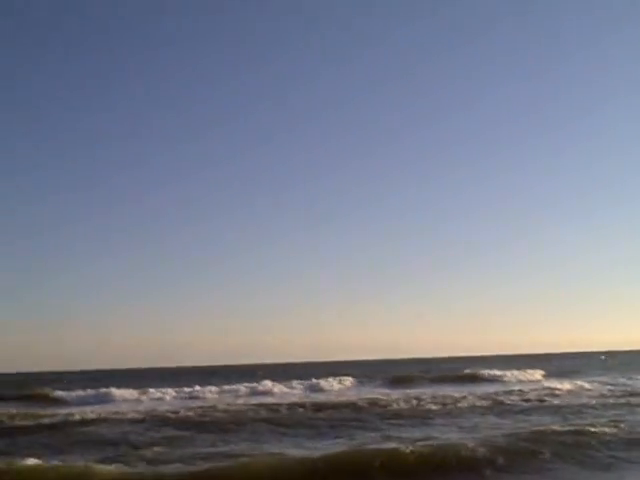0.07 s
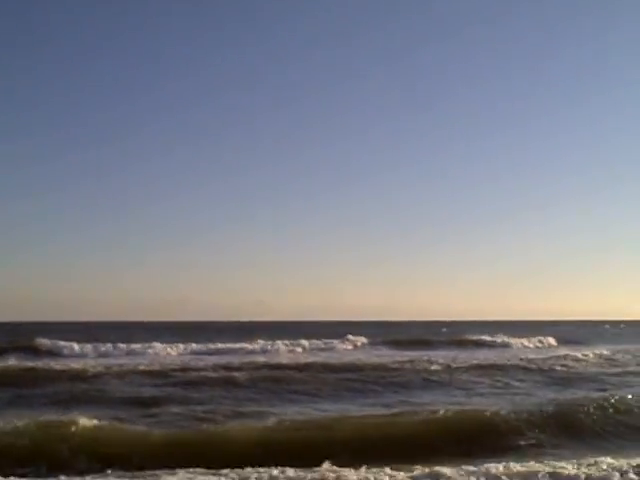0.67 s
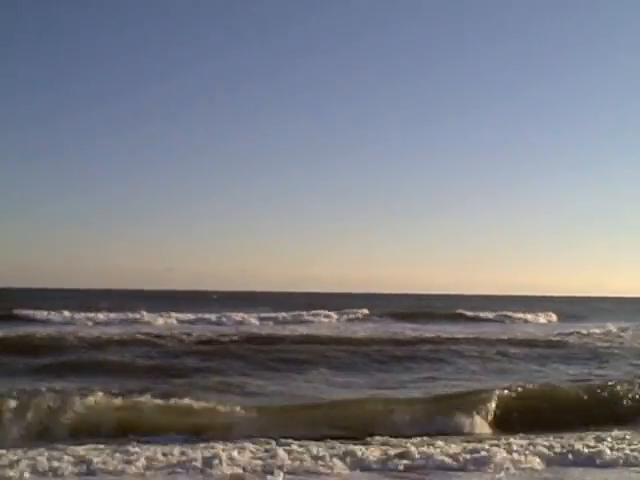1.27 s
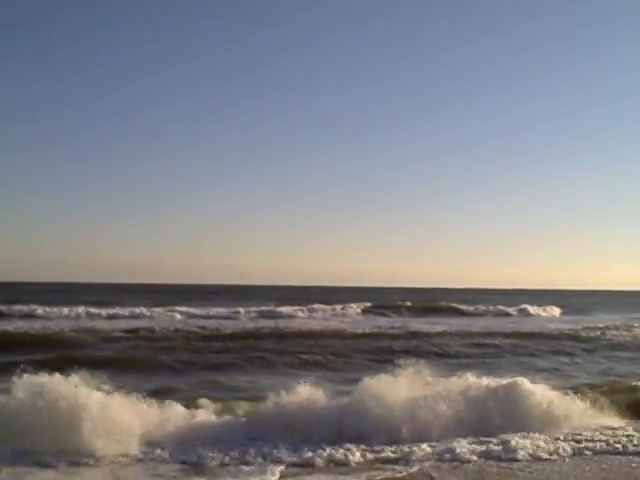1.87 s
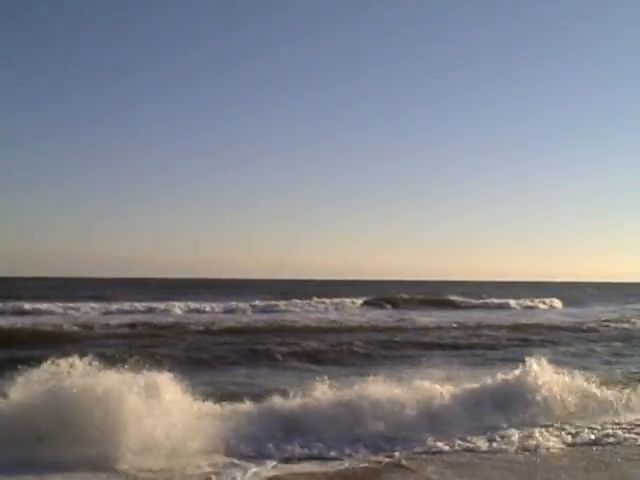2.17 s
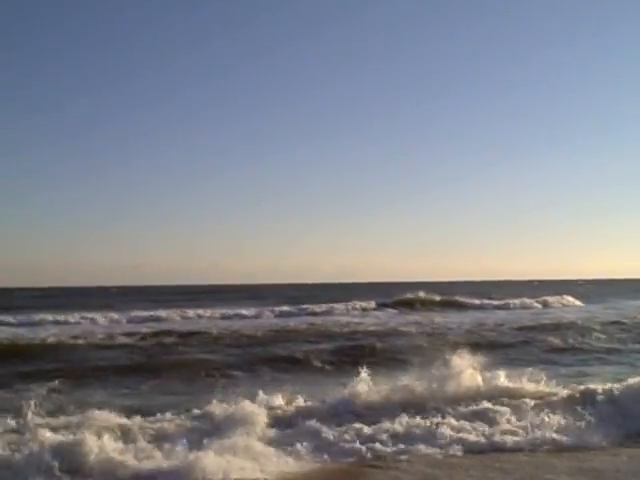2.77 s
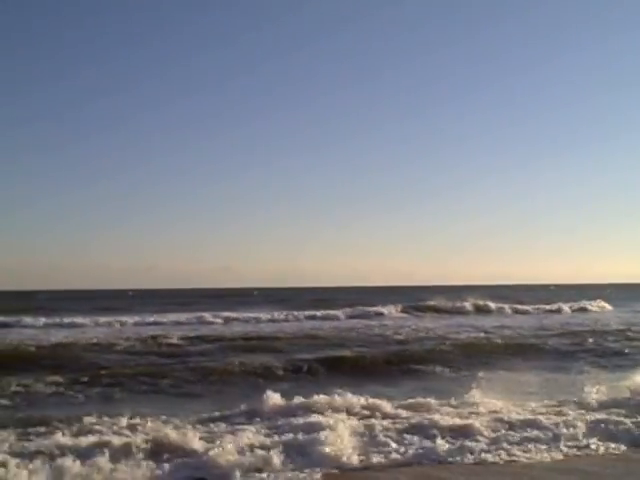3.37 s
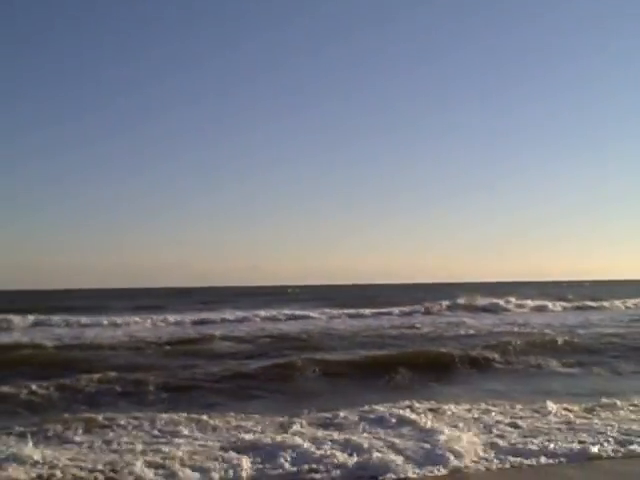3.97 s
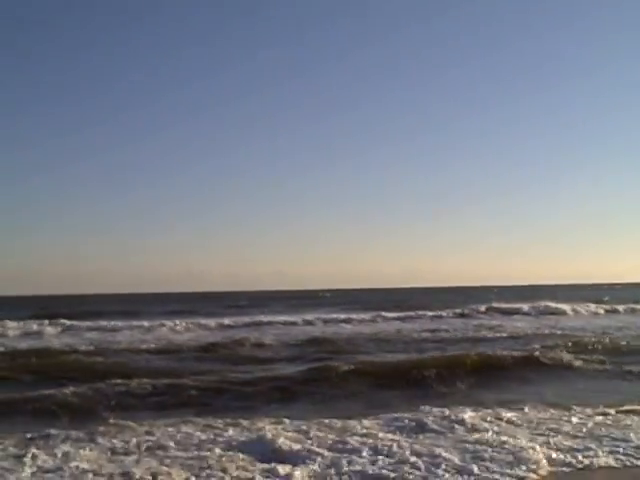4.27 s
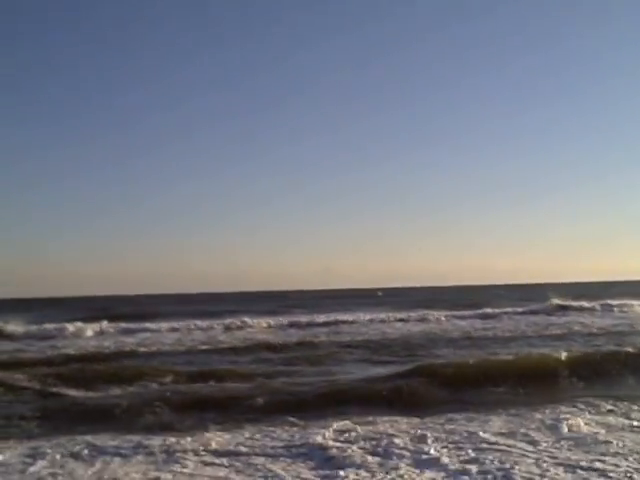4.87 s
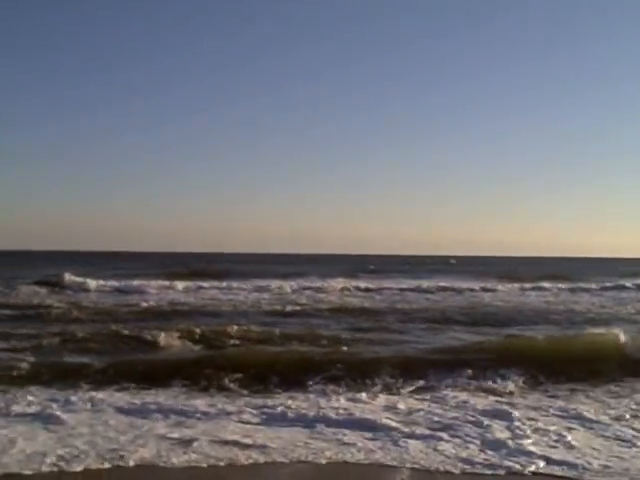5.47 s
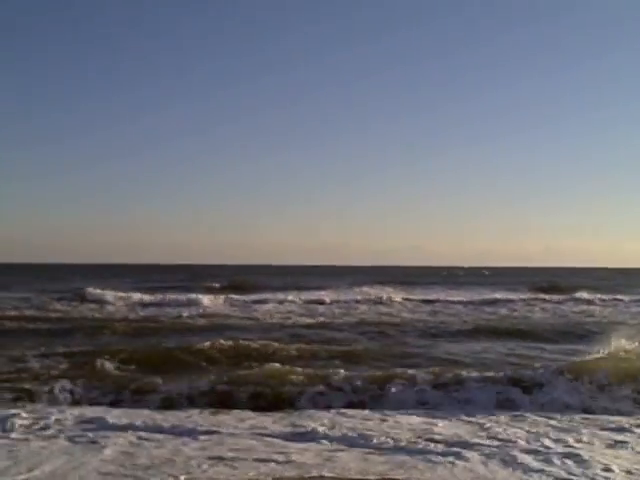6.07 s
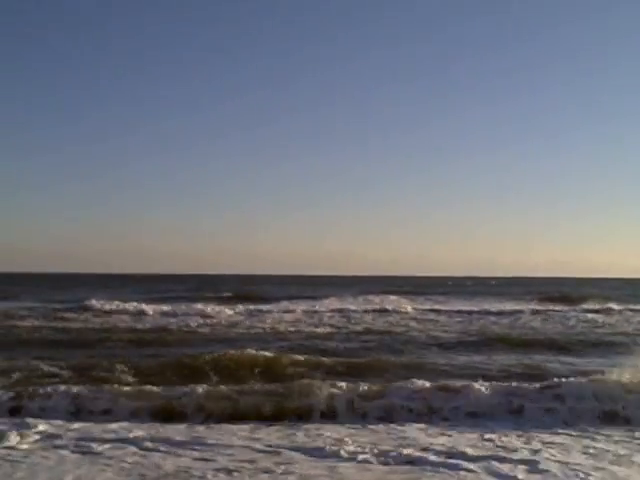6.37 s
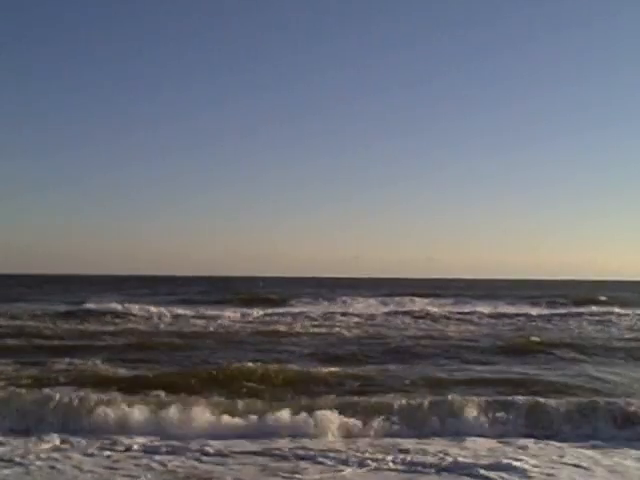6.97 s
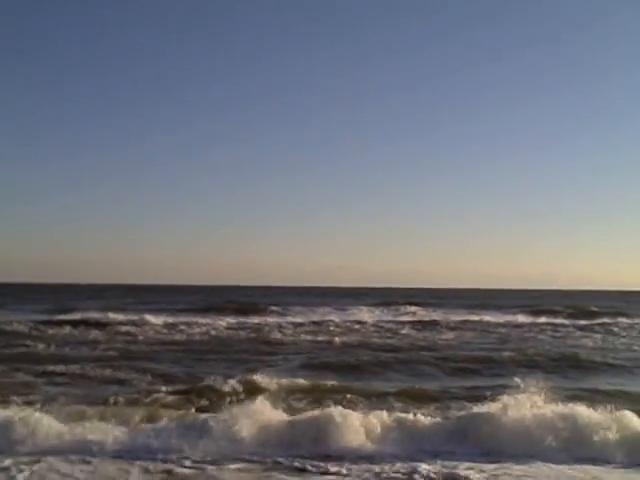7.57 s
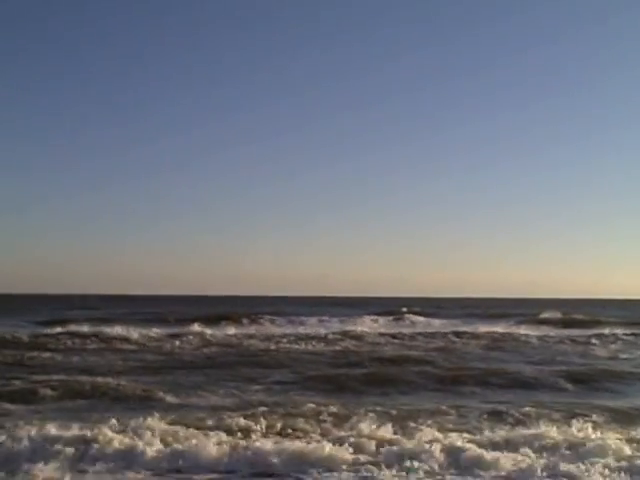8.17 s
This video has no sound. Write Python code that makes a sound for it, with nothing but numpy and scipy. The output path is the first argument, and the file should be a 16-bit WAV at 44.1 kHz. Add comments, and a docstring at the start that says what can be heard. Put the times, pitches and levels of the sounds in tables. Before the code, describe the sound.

Two ocean waves crash and wash up a sandy beach with fizzing foam, while gusts of wind rumble and bump on the microphone.

```python
"""A sandy beach, at the water's edge, heard through a small microphone.
Two waves break: the air they trap roars, foam seethes up the sand, and tiny bursting bubbles make
the spray fizz. In between, water washes about, crests slap over and stray drops tick.
Gusts of wind rumble and bump on the microphone, whose opening rings in the treble.
A few dull thuds come in the second half."""
import sys
import numpy as np
from scipy import signal
from scipy.fft import rfft, irfft, next_fast_len
from scipy.io import wavfile
from scipy.ndimage import uniform_filter1d, map_coordinates

SR = 44100
rng = np.random.default_rng(int(sys.argv[2]) if len(sys.argv) > 2 else 0)


def transcribe(u):
    """Save the signal u as a 16-bit wav file named by the first command-line argument.

    u: samples, shape (n,) or (channels, n), limited to [-1, 1]; the rate is SR.
    q: integer samples, one column per channel.
    """
    v = np.clip(np.atleast_2d(u).T, -1, 1)
    q = np.round(v * 32767).astype(np.int16)
    wavfile.write(sys.argv[1], SR, q)


N = 362061

TOP_HZ = 9230  # the highest pitch that is heard
# the tone of seething foam: f/Hz, level/dB
FOAM_TONE = [(500, -14.5), (1100, -3.5), (1700, -2.5), (2200, 0), (2750, .5), (3300, -3.5), (4500, -4.5),
             (6500, -11), (9000, -13.5)]
# the brighter tone of spray: f/Hz, level/dB
SPRAY_TONE = [(900, -40.5), (2000, -14), (3200, -2), (4300, -0.5), (5500, -1), (7000, 0), (9000, -4.5)]


def amp(db):
    """Turn decibels into a gain, the number to multiply a sound by."""
    return 10 ** (np.asarray(db) / 20)


def unit(x):
    """Scale a sound to an average strength (rms) of 1."""
    return x / np.sqrt(np.mean(x ** 2) + 1e-20)


def clock():
    """The time of every sample, in seconds."""
    return np.arange(N) / SR


def curves(rows):
    """Join a table's points with straight lines: one curve for each column after the time."""
    times, *columns = np.transpose(rows)
    return [np.interp(clock(), times, column) for column in columns]


def wobble(rate):
    """A smooth curve through `rate` random points a second."""
    return map_coordinates(rng.standard_normal(int(N * rate / SR) + 4), [clock() * rate])


def coloured(x, tone, top_hz=np.inf):
    """Turn each pitch up or down as the tone table says, and keep nothing above top_hz."""
    size = next_fast_len(N + 8192)
    hz = np.fft.rfftfreq(size, 1 / SR)
    tone_hz, tone_db = np.transpose(tone)
    gain = amp(np.interp(np.log(hz + 1), np.log(tone_hz + 1), tone_db)) * (hz < top_hz)
    return irfft(rfft(x, size) * gain, size)[:N]


def rush(tone):
    """Steady noise with the given tone."""
    return unit(coloured(rng.standard_normal(N), tone))


def wind():
    """Moving air rumbles on the microphone and breaks into small, quick swirls."""
    # how hard it blows: t/s, rumble level/dB, swirl level/dB
    gusts = [(0, -30, -41.5), (0.42, -25.5, -36), (0.8, -26, -32), (1.24, -32.5, -35.5), (1.34, -20, -26),
             (2.3, -18, -20.5), (2.8, -22.5, -26.5), (3.05, -18, -22.5), (3.62, -22, -25),
             (3.88, -14, -14.5), (4.28, -19, -21), (5, -27.5, -26), (5.6, -21, -18), (6.05, -21, -20),
             (6.55, -23, -24), (7.35, -27.5, -18), (7.95, -19, -20), (8.21, -28, -22)]
    # the tone of the deep rumble: f/Hz, level/dB
    rumble_tone = [(8, -8.5), (22, -4), (42, 0), (65, -5), (95, -23.5), (160, -26), (400, -46.5),
                   (900, -72.5)]
    # the slightly higher tone of the swirls: f/Hz, level/dB
    swirl_tone = [(25, -27), (55, -6), (80, -0.5), (110, -2), (150, -8), (220, -14.5), (350, -26),
                  (900, -58)]
    rumble_db, swirl_db = curves(gusts)
    puffs_db = wobble(14) + 1.1 * wobble(6)
    rumble = amp(rumble_db) * rush(rumble_tone)
    swirls = amp(swirl_db) * rush(swirl_tone)
    return amp(puffs_db) * (rumble + swirls)


def churn(tone, patchy_db):
    """Noise in which patches of pitch swell and fade, as clumps of bubbles come and go."""
    grid = signal.stft(rng.standard_normal(N), nperseg=512)[2]  # rows are pitches, columns are moments
    patches = uniform_filter1d(rng.standard_normal(grid.shape), size=9, axis=0)
    patches = uniform_filter1d(patches, size=12, axis=1)
    patchy_noise = signal.istft(grid * amp(patchy_db * unit(patches)), nperseg=512)[1][:N]
    return unit(coloured(patchy_noise, tone))


def bubbles(count, centre_hz, spread, cycles, scatter_db):
    """A crowd of bursting bubbles: each is a quickly fading ping of its own pitch and loudness."""
    when, pitch, size = rng.random((count, 3)).T[:, :, None]
    hz = np.minimum(centre_hz * np.exp(spread * (2 * pitch - 1)), TOP_HZ)
    age = np.arange(SR // 400)  # in samples
    turns = hz * age / SR
    pings = amp(scatter_db * size) * np.sin(2 * np.pi * turns) * np.exp(-turns / cycles)
    positions = (when * N).astype(int) + age
    return unit(np.bincount(positions.ravel(), pings.ravel(), N)[:N])  # add each ping in at its place


def surge(peak_s, db, shape):
    """The gain of one stage of a wave: it builds up until peak_s, holds, then fades."""
    build, hold, fade = shape
    age = clock() - peak_s
    return amp(db - build * np.maximum(-age, 0) - fade * np.maximum(age - hold, 0))


def wave_gains():
    """Gains of roar, swash, foam and spray: a wave crashes, its air cloud follows, foam runs ashore."""
    # foamy water that washes about between the waves: t/s, level/dB
    wash = [(0, -56), (0.8, -47), (4.3, -39), (5.05, -40.5), (5.6, -38), (6, -37), (6.45, -39.5),
            (8.21, -33)]
    # breaking waves: crash t/s, crash level/dB, cloud delay/s, cloud level/dB,
    # run-up delay/s, run-up level/dB, swash level/dB
    waves = [(1.379, -27, 0.13, -28, 1.09, -26, -35), (6.751, -31.5, 0.35, -29, 0.9, -32, -43.5)]
    # how each stage comes and goes: build/(dB per s), hold/s, fade/(dB per s)
    crash_shape = (37, 0.037, 8.4)
    cloud_shape = (14.4, 0.95, 4.03)
    swash_shape = (20.4, 2.73, 15.8)
    runup_foam_shape = (14.5, 0.2, 8.9)
    runup_spray_shape = (13.6, 0.12, 9.2)
    wash_db, = curves(wash)
    roar, swash = [amp(wash_db - 1.5)], [amp(wash_db - 6.5)]
    foam, spray = [amp(wash_db - 2.5)], [amp(wash_db)]
    for start, crash_db, cloud_delay, cloud_db, runup_delay, runup_db, swash_db in waves:
        crash = surge(start, crash_db, crash_shape)
        sheet = surge(start, swash_db, swash_shape)
        runup_foam = surge(start + runup_delay, runup_db - 5, runup_foam_shape)
        runup_spray = surge(start + runup_delay, runup_db, runup_spray_shape)
        roar.append(surge(start + cloud_delay, cloud_db, cloud_shape))
        swash.append(sheet)
        foam += [amp(-5.5) * crash, amp(-3) * sheet, runup_foam]
        spray += [crash, runup_spray]
    # unrelated noises add up as the square root of the sum of their squares
    return [np.linalg.norm(parts, axis=0) for parts in (roar, swash, foam, spray)]


def surf():
    """Trapped air roars, a sheet of water (the swash) churns up the sand, foam seethes, spray fizzes."""
    # the tone of the cloud of trapped air: f/Hz, level/dB
    roar_tone = [(80, -14.5), (200, 5.5), (300, 2.5), (400, 0), (570, 2), (720, -8), (830, -5.5),
                 (1100, -25.5), (1600, -19), (4000, -57.5)]
    # the tone of big air pockets: f/Hz, level/dB
    boom_tone = [(50, -22.5), (130, 3), (200, 2), (320, -3), (480, -2), (600, -6), (900, -28), (2000, -62)]
    # the tone of water running over sand: f/Hz, level/dB
    swash_tone = [(300, -17.5), (650, 4.5), (820, 0.5), (980, -2), (1130, -6), (1400, -7), (2100, -7.5),
                  (3500, -22), (9000, -45)]
    roar_gain, swash_gain, foam_gain, spray_gain = wave_gains()
    roar = roar_gain * churn(roar_tone, patchy_db=1.74)
    # only a heavy plunge drives down the big air pockets that boom
    heaviness = (roar_gain / roar_gain.max()) ** 0.57
    boom = amp(2) * roar_gain * heaviness * rush(boom_tone)
    swash = swash_gain * churn(swash_tone, patchy_db=0.44)
    popping = bubbles(count=14000, centre_hz=2370, spread=0.57, cycles=2.9, scatter_db=26)
    foam = foam_gain * (churn(FOAM_TONE, patchy_db=0.57) + amp(-10.5) * popping)
    fizz = bubbles(count=20000, centre_hz=5590, spread=0.36, cycles=2.0, scatter_db=20.5)
    spray = spray_gain * (churn(SPRAY_TONE, patchy_db=0.6) + amp(-8.5) * fizz)
    # the foamy water surges as one while it tumbles
    tumble_db = 0.38 * wobble(6) + 0.41 * wobble(19) + 0.22 * wobble(60)
    return roar + boom + amp(tumble_db) * (swash + foam + spray)


def drops(splash):
    """Single drops land close by, each a tiny tick of splash noise."""
    # the drops: t/s, level/dB, time to fade by 60 dB/s
    landings = [(1.004, -26, 0.0082), (6.342, -24.5, 0.026)]
    gain = np.zeros(N)
    for start, db, fade_s in landings:
        age = np.maximum(clock() - start, 0)
        gain += amp(db - 60 * age / fade_s) * (age > 0)
    return gain * splash


def slaps(splash):
    """A crest slaps down: the splash noise rises fast, then dies away with the spray."""
    # the falling crests: t/s, level/dB, rise time/s, time to fade by 60 dB/s
    crests = [(1.56, -22, 0.03, 0.51), (5.25, -26.5, 0.017, 0.46), (5.96, -33, 0.0066, 0.66)]
    gain = np.zeros(N)
    for start, db, rise_s, fade_s in crests:
        age = np.maximum(clock() - start, 0)
        gain += amp(db - 60 * age / fade_s) * (1 - np.exp(-age / rise_s))
    return gain * splash


def wind_bumps():
    """The hardest swirls of air strike the microphone, each with a single swing of pressure."""
    # the strikes: t/s, level/dB, f/Hz
    strikes = [(3.778, -3, 56.3), (3.904, 0.5, 69.7), (3.956, -6, 66.4), (4.111, -1, 64.6),
               (5.494, -4, 92.6), (5.886, -0.5, 87), (5.905, -4.5, 110), (6.2, -7.5, 74.4),
               (7.653, -7, 115), (7.698, -3.5, 117), (7.837, -5, 108), (8.036, -6, 85)]
    bumps = np.zeros(N)
    for peak_s, db, hz in strikes:
        swing = (np.pi * hz * (clock() - peak_s)) ** 2
        bumps += amp(db) * (2 * swing - 1) * np.exp(-swing)
    return bumps


def thuds():
    """Short, dull swells of noise, pitched just above the wind's rumble."""
    # the swells: t/s, level/dB, width/s
    swells = [(5.733, -20, 0.033), (6.295, -20.5, 0.027), (7.414, -16, 0.051), (7.516, -15, 0.045),
              (7.92, -22, 0.071)]
    # their dull tone: f/Hz, level/dB
    thud_tone = [(60, -6), (130, -1), (200, 1), (290, -16.5), (420, -18), (900, -39)]
    gain = sum(amp(db) * np.exp(-((clock() - peak_s) / width) ** 2) for peak_s, db, width in swells)
    return gain * rush(thud_tone)


def scene():
    """Sea and wind together, in one channel."""
    sea = surf()
    splash = unit(rush(FOAM_TONE) + amp(4) * rush(SPRAY_TONE))
    return (sea + drops(splash) + slaps(splash) + thuds() + wind() + wind_bumps())[None]


def record(dry):
    """The microphone's opening lifts the treble, hard gusts overload it, and the top is cut off."""
    # the ring of the opening: f/Hz, gain/dB
    opening_tone = [(4300, 0), (5200, 3.5), (5900, 8), (6550, 11.5), (7000, 8), (7450, 4), (7900, -4),
                    (8300, -6.5), (8700, -14), (9050, -25.5), (9250, -48)]
    heard = coloured(dry[0], opening_tone)
    ceiling, hardness = 0.74, 8  # loud peaks are rounded off just below the ceiling
    squashed = heard / (1 + np.abs(heard / ceiling) ** hardness) ** (1 / hardness)
    return coloured(squashed, tone=[(1, 0)], top_hz=TOP_HZ)[None]  # a flat tone: only the cut acts


dry = scene()
out = record(dry)
transcribe(out)
```